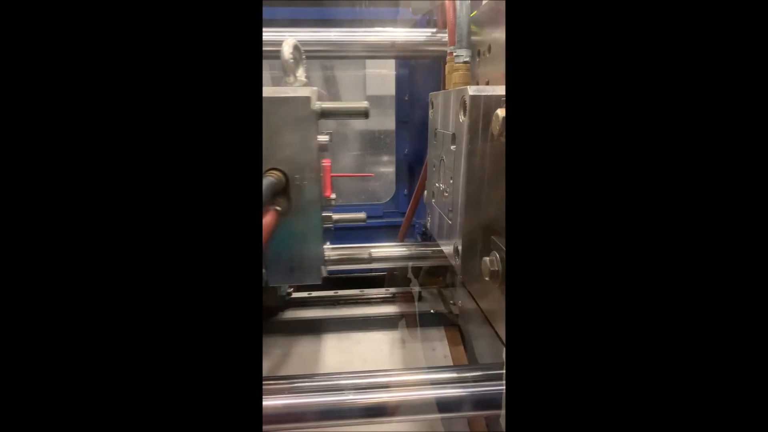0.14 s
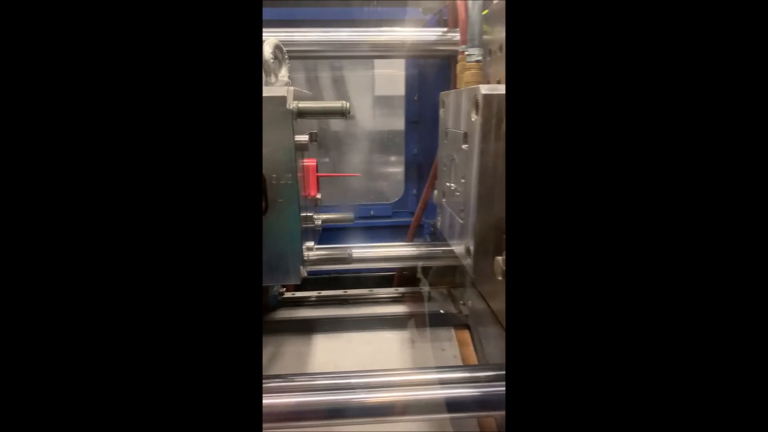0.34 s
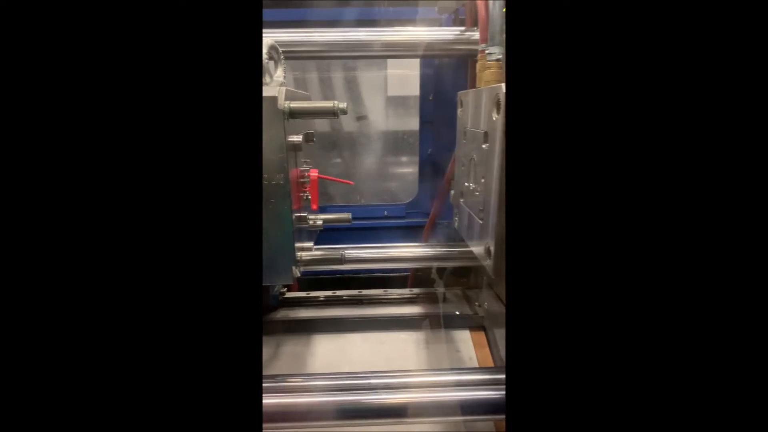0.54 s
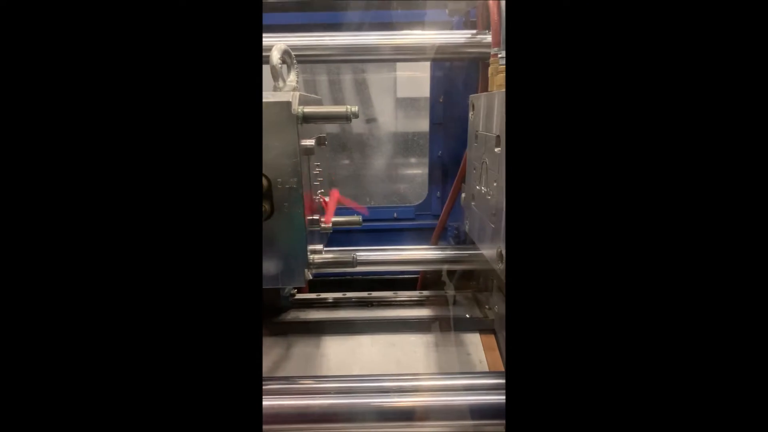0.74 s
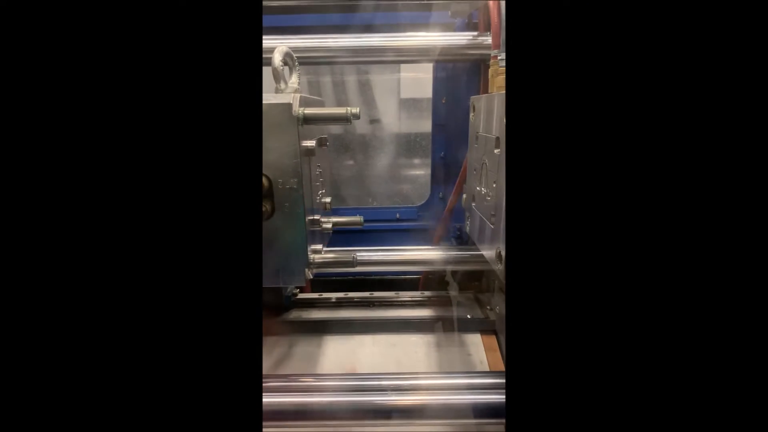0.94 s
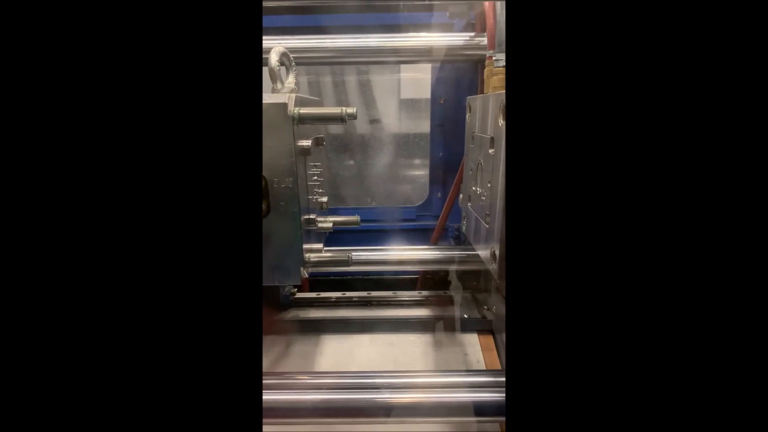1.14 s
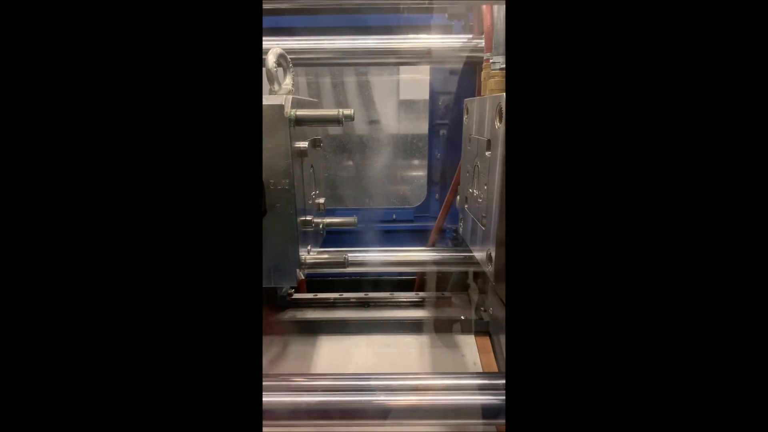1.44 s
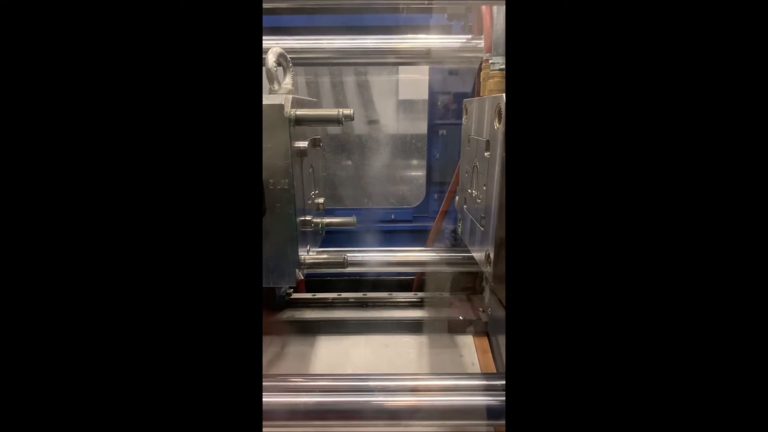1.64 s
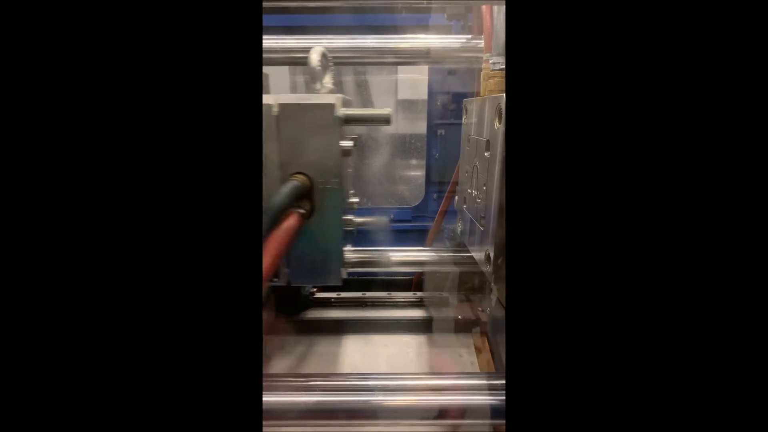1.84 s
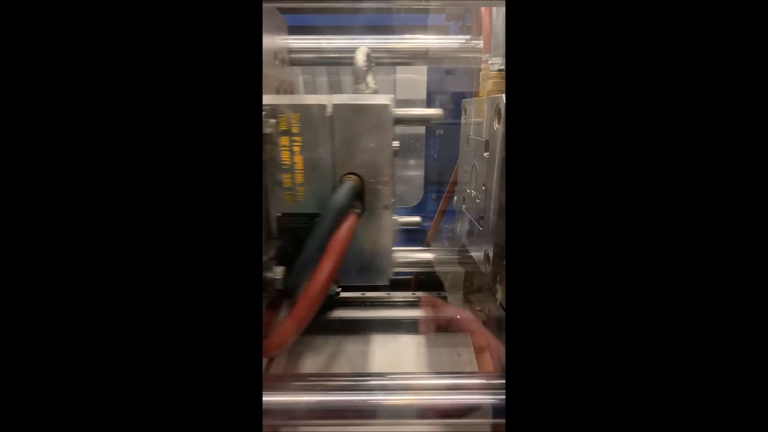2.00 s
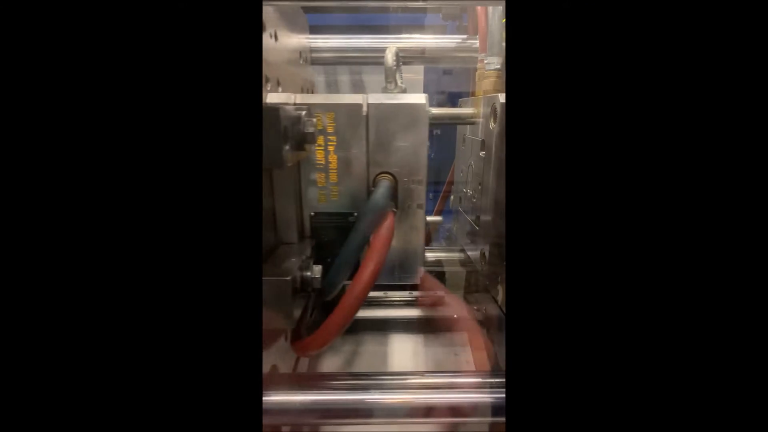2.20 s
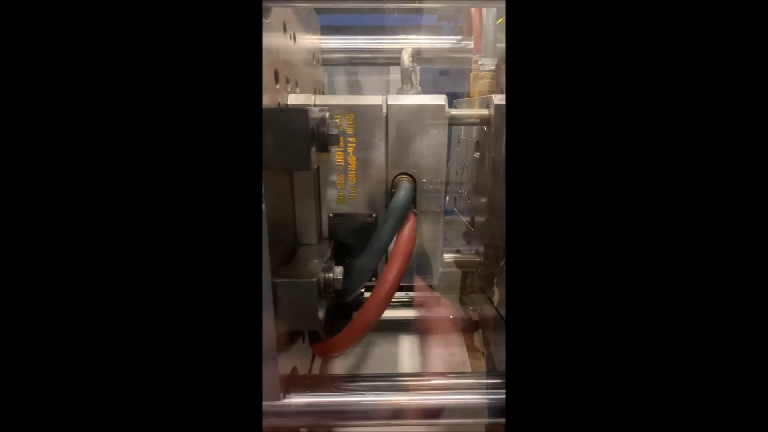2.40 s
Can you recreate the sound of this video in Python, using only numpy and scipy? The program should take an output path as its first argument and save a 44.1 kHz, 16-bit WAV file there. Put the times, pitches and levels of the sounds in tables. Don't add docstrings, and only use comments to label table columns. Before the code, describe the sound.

An injection moulding machine drones with hydraulic pump whine, motor roar and oil hiss; the ejector knocks, small parts tick on steel, then a loud clatter and dull thuds follow. Close stereo microphone in a factory hall.

```python
import sys
import numpy as np
from scipy import signal
from scipy.fft import rfft, irfft, next_fast_len
from scipy.io import wavfile

SR = 44100
rng = np.random.default_rng(int(sys.argv[2]) if len(sys.argv) > 2 else 0)


def unload_wav(signal):
    wavfile.write(
        sys.argv[1],
        SR,
        np.round(np.clip(np.atleast_2d(signal).T, -1, 1) * 32767).astype(np.int16),
    )


def how_loud(loudness_db):
    steps = np.asarray(loudness_db, float) / 20
    return 10 ** steps


N = 112896
LEFT_RIGHT = np.array([[1], [-1]])


def rms_one(x):
    return x / np.sqrt(np.mean(x ** 2) + 1e-20)


def at_hz(points, hz):
    table = np.array(points)
    return np.interp(np.log(hz), np.log(table[:, 0]), table[:, 1])


def balance(db):
    return how_loud(db / 2 * LEFT_RIGHT)


def drift(rate):
    r = np.exp(-80 * np.pi * rate / SR)
    slow = signal.lfilter([1], [1, -2 * r, r * r], rng.standard_normal(N // 40 + 2002))
    slow = slow[2000:]
    return np.interp(np.arange(N) / 40, np.arange(len(slow)), rms_one(slow))


def ring(clicks, hz, t60):
    r = how_loud(-60 / (t60 * SR))
    w = 2 * np.pi * hz / SR
    return signal.lfilter([0, np.sin(w)], [1, -2 * r * np.cos(w), r * r], clicks + 1e-18)


def partial(hz, db, pan_db=0, wander=0):
    turn = 2 * np.pi * hz * np.arange(N) / SR + rng.uniform(0, 2 * np.pi) + wander
    return np.sqrt(2) * how_loud(db) * np.sin(turn) * balance(pan_db)


LOW_PUMP_HZ, TWIN_A_HZ, TWIN_B_HZ = 199.22, 239.07, 238.575
MOTOR_HZ, MOTOR_DB, MOTOR_FLUTTER_DB = 58.45, -41, 4.5
LOW_FLUTTER_DB, TWIN_FLUTTER_DB = 1.2, 3.8
WHINE_SPREAD_DB, WHINE_FLUTTER_DB, WHINE_WANDER = 2.5, 5, 0.023
# multiple of the stroke rate, level in dB, left minus right in dB.
LOW_PUMP_PARTIALS = [(2, -62, 31), (4, -48.5, -5), (5, -42, -1.5), (7, -53, 0), (8, -88, 7), (9, -57, 3),
                     (11, -62.5, 14.5), (13, -62.5, -5), (18, -70, 25)]
# multiple, level in dB, left minus right in dB.
TWIN_PARTIALS = [(2, -53, -5), (4, -52, -9), (5, -55, 17.5), (6, -66, 1), (7, -63, 4), (15, -61, -13),
                 (17, -64, 12.5)]
# loudest level in dB, time of the dip in seconds, beat period in seconds, depth from 0 to 1.
BEATS = [
    (-32.5, 1.22, 2.57, 0.77),
    (-33.5, 0.91, 2.2, 0.59),
    (-35.5, 2.54, 3.15, .4),
]
# frequency in Hz, partial level in dB.
WHINE_A = [(4300, -70), (4800, -59), (5900, -69.5), (6900, -62.5), (7600, -72), (8600, -66), (10200, -65),
           (11200, -74), (15800, -76)]
# frequency in Hz, partial level in dB.
WHINE_B = [(4300, -73), (5900, -70), (6600, -62), (7500, -65.5), (8200, -60), (9100, -61.5), (10000, -69),
           (11500, -75), (14300, -65.5), (15300, -73)]


def pumps():
    t = np.arange(N) / SR
    flutter = [drift(3.5) for _ in range(12)]
    out = np.zeros((2, N))
    for i, (k, db, pan_db) in enumerate(LOW_PUMP_PARTIALS):
        out += partial(k * LOW_PUMP_HZ, db + LOW_FLUTTER_DB * flutter[i], pan_db)
    for i, (k, db, pan_db) in enumerate(TWIN_PARTIALS):
        out += partial(k * TWIN_A_HZ, db + TWIN_FLUTTER_DB * flutter[-i], pan_db)

    beating_hz = (LOW_PUMP_HZ, TWIN_A_HZ, 3 * LOW_PUMP_HZ)
    for hz, (db, dip_s, period, depth) in zip(beating_hz, BEATS):
        dip = (1 + np.cos(2 * np.pi * (t - dip_s) / period)) / 2
        out += partial(hz, db) * (1 - depth * dip)
    out += partial(MOTOR_HZ, MOTOR_DB + MOTOR_FLUTTER_DB * drift(1.4))

    for stroke_hz, whine in (TWIN_A_HZ, WHINE_A), (TWIN_B_HZ, WHINE_B):
        wander = WHINE_WANDER * drift(1.7)
        for k in range(18, 66):
            db = at_hz(whine, k * stroke_hz) + WHINE_SPREAD_DB * rng.normal()
            db = db + WHINE_FLUTTER_DB * np.roll(flutter[k % 12], rng.integers(N))
            out += partial(k * stroke_hz, db, wander=k * wander)
    return out


THUD_CYCLES, THUD_RISE_CYCLES = 10.2, 0.87
THUD_UPPER_DB, THUD_UPPER_RATIO = -12, 1.557
# start in seconds, peak in dB, pitch in Hz.
THUDS = [(.368, -19, 630), (1.0938, -18, 447), (1.103, -21, 513), (1.109, -21, 660), (1.113, -17.5, 256),
         (1.589, -20.5, 724), (1.597, -18.5, 456), (1.661, -19.5, 300), (1.743, -10, 505),
         (1.748, -15.5, 141), (1.751, -14.5, 693), (1.754, -17.5, 195), (1.7559, -8, 413),
         (1.762, -11.5, 646), (1.7676, -11, 512), (1.774, -19.5, 814), (1.799, -29, 287),
         (1.817, -21, 89.6), (1.838, -19.5, 207), (1.841, -20, 670), (1.876, -21, 293), (1.886, -18, 720),
         (1.897, -23, 786), (1.901, -17.5, 199), (1.927, -14, 240), (1.976, -15, 195), (2.109, -14, 255),
         (2.242, -22.5, 84.6)]


def thuds():
    out = np.zeros(N + SR)
    t = np.arange(SR // 4) / SR
    for s, db, hz in THUDS:
        shape = (1 - np.exp(-t * hz / THUD_RISE_CYCLES)) * how_loud(-60 * t * hz / THUD_CYCLES)
        tone = np.sin(2 * np.pi * hz * t)
        tone += how_loud(THUD_UPPER_DB) * np.sin(2 * np.pi * hz * THUD_UPPER_RATIO * t)
        start = int(s * SR)
        out[start:start + len(t)] += how_loud(db + 7.5) * shape * tone
    return out[:N]


# frequency in Hz, left minus right in dB.
SIDES = [(250, -0.4), (450, -4), (750, 1), (1500, -1.5), (3000, 0.3)]
RATTLE_START_S, RATTLE_END_S, RATTLE_PER_S, RATTLE_DB = 1.731, 1.779, 1200, -48.5
TICK_OCTAVES, TICK_SMEAR_S, MODE_SPREAD_DB, GRIT_DB = 0.19, 0.0013, 1, -4.5
# frequency in Hz, level in dB, 60 dB decay in seconds.
PLATE_MODES = [(1094, 3, 0.039), (1340, 0.5, 0.048), (1600, -1, 0.026), (1966, -3, 0.025), (2280, 1, 0.013),
               (2580, -1.5, .015), (3140, -3.5, 0.023), (3594, 2.5, 0.014), (4290, 3.5, 0.011),
               (5410, 3, 0.014), (5580, -4.5, 0.016), (6300, -2, 0.017), (7700, -4.5, 0.0055),
               (11000, 1.5, 0.0065)]
# start in seconds, peak in dB, brightest frequency in Hz.
TICKS = [(1.0915, -23, 1340), (1.094, -31, 2200), (1.097, -19, 1050), (1.099, -32, 2500),
         (1.113, -29, 1600), (1.297, -29, 1450), (1.428, -29.5, 2000), (1.450, -25.5, 2280),
         (1.453, -23, 5600), (1.453, -20.5, 3170), (1.454, -24, 7700), (1.456, -29.5, 2000),
         (1.506, -32, 2040), (1.517, -30, 2290), (1.519, -32, 3200), (1.526, -22.5, 2000),
         (1.53, -28, 1600), (1.550, -27, 3170), (1.583, -30, 2400), (1.585, -32, 1410), (1.596, -24, 1340),
         (1.621, -27, 2200), (1.627, -27, 1340), (1.66, -28, 6400), (1.676, -37, 6400), (1.73, -23, 6400),
         (1.734, -18, 1390), (1.734, -19, 2650), (1.7364, -11, 1390), (1.738, -25, 3600),
         (1.7385, -40, 11000), (1.744, -15, 1980), (1.7458, -20, 3600), (1.7457, -13.5, 5280),
         (1.7465, -31, 11000), (1.7491, -21.5, 11000), (1.750, -25, 6300), (1.7526, -22, 1600),
         (1.7585, -25, 11000), (1.76, -26, 6300), (1.7619, -15, 2160), (1.763, -21, 3100),
         (1.7635, -27, 6300), (1.7727, -21, 6200), (1.775, -33, 11000), (1.774, -16.5, 1600),
         (1.7746, -22.5, 3600), (1.776, -27, 6300), (1.778, -28, 1600), (1.793, -33, 1680),
         (1.8403, -20, 11000), (1.8415, -31, 1600), (1.843, -24.5, 2500), (1.886, -23, 1840),
         (1.888, -31.5, 1060), (1.933, -33, 11000), (1.936, -27, 1190), (1.975, -26, 2240),
         (1.976, -36, 1500), (2.056, -30, 1700), (2.107, -25, 1740)]


def ticks():
    s, db, centre = np.transpose(TICKS)
    t, out = np.arange(N) / SR, np.zeros((2, N))
    chance = rng.standard_normal((len(s), len(PLATE_MODES)))
    fade = np.exp(-1 / (TICK_SMEAR_S * SR))
    clank = (t > RATTLE_START_S) * (t < RATTLE_END_S)
    for k, (hz, mode_db, t60) in enumerate(PLATE_MODES):
        nearness = np.exp(-.5 * (np.log2(hz / centre) / TICK_OCTAVES) ** 2)
        kicks = np.zeros(N)
        kicks[(s * SR).astype(int)] = how_loud(db - 3.5 + mode_db + MODE_SPREAD_DB * chance[:, k]) * nearness
        grit = signal.lfilter([np.sqrt(1 - fade ** 2)], [1, -fade], kicks + 1e-18)
        grit = grit * rng.choice([-1, 1], N)
        rattle = clank * (rng.random(N) < RATTLE_PER_S / SR) * rng.standard_normal(N)
        force = kicks + how_loud(GRIT_DB) * grit + how_loud(RATTLE_DB + mode_db) * rattle
        out += ring(force, hz, t60) * balance(at_hz(SIDES, hz))
    return out


CRACK_S, CRACK_LIKENESS, CRACK_TOP_HZ = 0.0018, 0.72, 11000
# start in seconds, peak in dB, lowest frequency in Hz.
CRACKS = [(1.4525, -26, 2000), (1.731, -27, 4000), (1.7418, -20, 14000), (1.7458, -24, 3000),
          (1.7487, -20, 8000), (1.755, -20, 5000), (1.7585, -18, 12000), (1.76, -39, 6000),
          (1.770, -31, 9000), (1.773, -24, 9000), (1.774, -29, 9050), (1.8335, -25, 1200),
          (1.841, -31, 9500), (1.8437, -20.5, 2980), (1.857, -31, 8000), (1.8638, -26, 9000),
          (1.889, -23, 8000), (1.934, -30, 8500), (2.107, -34, 8300)]


def cracks():
    out = np.zeros((2, N + SR))
    t = np.arange(1024) / SR
    for s, db, low_hz in CRACKS:
        burst = rng.standard_normal((2, len(t))) * np.exp(-t / CRACK_S)
        highpass = signal.butter(2, low_hz, "high", fs=SR, output="sos")
        mid, side = signal.sosfilt(highpass, burst)
        pair = np.sqrt(CRACK_LIKENESS) * mid + np.sqrt(1 - CRACK_LIKENESS) * side * LEFT_RIGHT
        start = int(s * SR)
        out[:, start:start + len(t)] += how_loud(db) * pair
    return signal.lfilter(*signal.butter(1, CRACK_TOP_HZ, fs=SR), out[:, :N])


# frequency in Hz, likeness from 0 to 1.
LIKENESS = [(150, .999), (300, 0.98), (550, 0.73), (900, 0), (1600, 0.37), (2500, 0), (3800, 0.93),
            (9000, 1)]


def spread(pair, hz):
    alike = np.clip(at_hz(LIKENESS, hz), 0, 1)
    both = np.sqrt(1 + alike) * pair[0] + np.sqrt(1 - alike) * pair[1] * LEFT_RIGHT
    return balance(at_hz(SIDES, hz)) * both


def banded_noise(spectrum, patchy_db):
    out, white = 0, rng.standard_normal((2, 2, N))
    edges = 41 * 2 ** np.arange(-1, 9, 1 / 3)
    edges = edges[(edges > spectrum[0][0] / 1.3) & (edges < spectrum[-1][0] * 1.3)]
    for k, (low, high) in enumerate(zip(edges, edges[1:])):
        hz = np.sqrt(low * high)
        bandpass = signal.butter(2, [low, high], "band", fs=SR, output="sos")
        band = signal.sosfilt(bandpass, white[k % 2])
        out = out + how_loud(at_hz(spectrum, hz) + patchy_db * drift(9.8)) * spread(band, hz)
    return rms_one(out)


# frequency in Hz, width in Hz, level in dB.
FRAME_MODES = [(60.6, 40, -39.5), (100.5, 20, -37.5), (348, 37, -40), (381.3, 14, -43), (422.2, 10, -42.5),
               (492, 11.3, -39.5), (1462, 20, -51)]


def frame():
    out = 0
    for hz, width, db in FRAME_MODES:
        t60 = np.log(1000) / np.pi / width
        pair = ring(rng.standard_normal((2, N)), hz, t60)
        out = out + how_loud(db) * rms_one(spread(pair, hz))
    return out


# frequency in Hz, density in dB per Hz.
ROAR = [(21, -33), (35, -18), (216, -3), (540, -9), (599, -6), (674, -13.5), (880, -19.5), (990, -10.5),
        (1200, -19.5), (1560, -59), (2640, -120)]


def roar(effort_db, swing_db):
    return how_loud(effort_db) * banded_noise(ROAR, patchy_db=3.5) + how_loud(swing_db) * frame()


HISS_DB, HISS_FOLLOWS = -37.5, 0.1
# frequency in Hz, density in dB per Hz.
HISS = [(900, 0), (1400, -1.5), (2400, -7.5), (3400, -5), (5000, -8.5), (8000, -12), (11000, -15.5),
        (15500, -24.5)]


def hiss(swing_db):
    return how_loud(HISS_DB + HISS_FOLLOWS * swing_db) * banded_noise(HISS, patchy_db=1.38)


HALL_T60_S, HALL_DB, WALL_CUT_HZ = 0.31, -27, 9700


def hall(x):
    size = next_fast_len(2 * N)
    w = 2 * np.pi * np.arange(size // 2 + 1) / size
    dull = 1 / (1 + 1j * w * SR / (2 * np.pi * WALL_CUT_HZ)) ** .5
    out = np.zeros((2, len(w)), complex)
    for k, lag in enumerate(rng.uniform(.02, .06, 16) * SR):
        loop = how_loud(-60 * lag / SR / HALL_T60_S) * dull * np.exp(-1j * w * lag)
        out[k % 2] += (-1) ** (k // 2) * loop / (1 - loop)
    return irfft(rfft(x.mean(axis=0), size) * out, size)[:, :N]


# time in seconds, level in dB.
EFFORT = [
    (0, -31),
    (.5, -31),
    (1.0, -31),
    (1.5, -32),
    (1.72, -29),
    (1.8, -26.5),
    (2.0, -31.5),
    (2.2, -30.5),
    (2.56, -33.5),
]


def scene():
    effort_db = np.interp(np.arange(N) / SR, *np.transpose(EFFORT))
    swing_db = effort_db - effort_db.mean()
    blows = thuds() + ticks() + cracks()
    machine = pumps() + blows
    background = roar(effort_db, swing_db) + hiss(swing_db)
    return machine + background + how_loud(HALL_DB) * hall(blows)


def band_limit(x):
    return signal.sosfilt(signal.butter(12, 16410, fs=SR, output="sos"), x)


MIC_LOW_HZ, CUTOFF_HZ = 46.4, 15720
# frequency in Hz, lead in radians.
PORT_LEAD = [(0, 0), (750, -.4), (1000, 1.4), (1200, 2.3), (1500, -.3), (4850, 3.14), (6800, 6.28),
             (16000, 19.8)]


def record(dry):
    size = next_fast_len(N + 2048)
    hz = np.arange(size // 2 + 1) * SR / size
    lead = np.interp(hz, *np.transpose(PORT_LEAD))
    ports = irfft(rfft(dry, size) * np.exp(.5j * lead * LEFT_RIGHT), size)[:, :N]
    ports = signal.sosfilt(signal.ellip(12, .5, 70, CUTOFF_HZ, fs=SR, output="sos"), ports)
    ports = signal.sosfilt(signal.butter(4, MIC_LOW_HZ, "high", fs=SR, output="sos"), ports)
    return band_limit(ports)


dry = scene()
out = record(dry)
unload_wav(out)
```